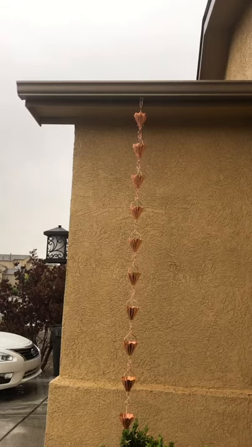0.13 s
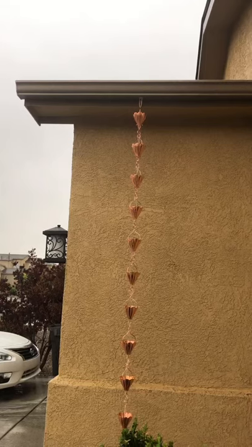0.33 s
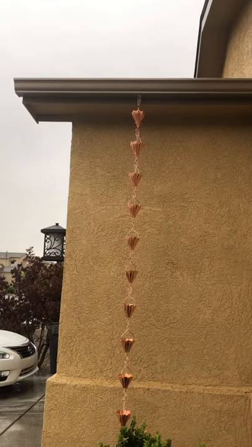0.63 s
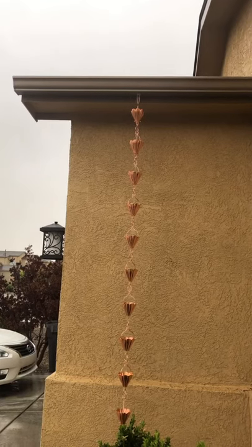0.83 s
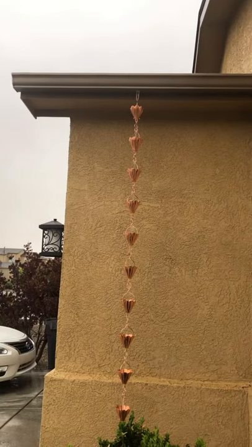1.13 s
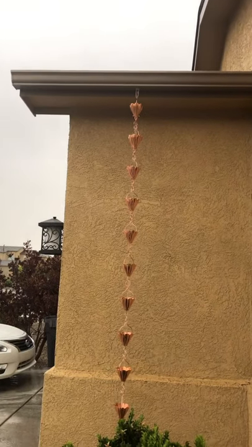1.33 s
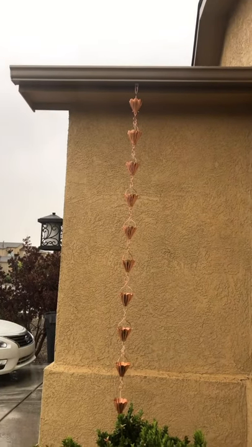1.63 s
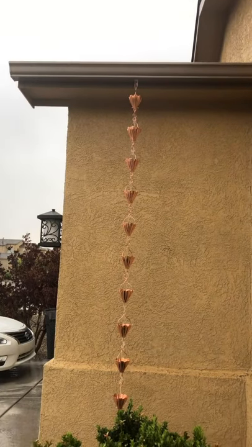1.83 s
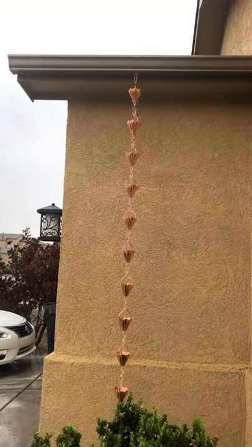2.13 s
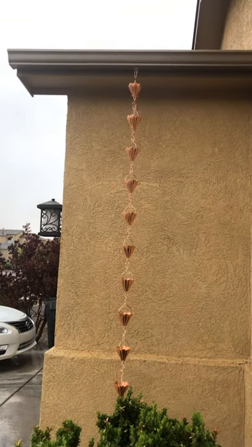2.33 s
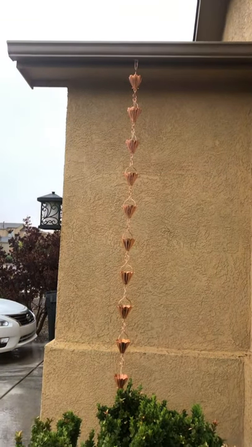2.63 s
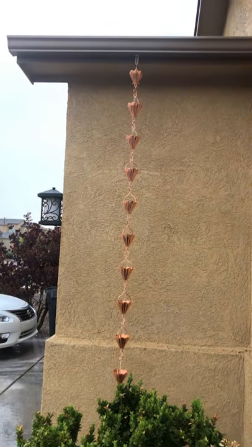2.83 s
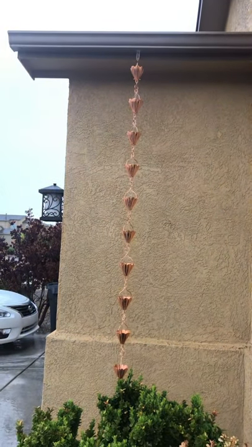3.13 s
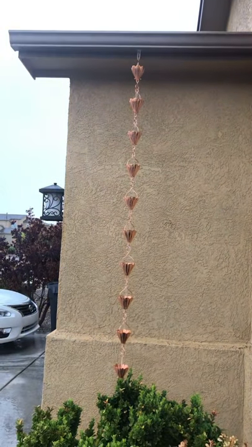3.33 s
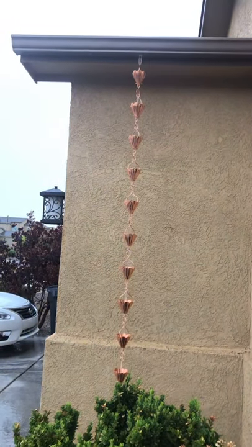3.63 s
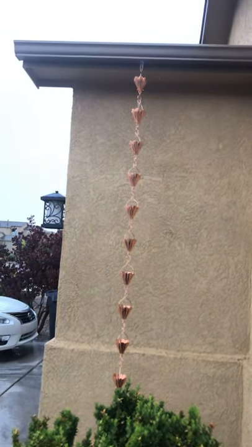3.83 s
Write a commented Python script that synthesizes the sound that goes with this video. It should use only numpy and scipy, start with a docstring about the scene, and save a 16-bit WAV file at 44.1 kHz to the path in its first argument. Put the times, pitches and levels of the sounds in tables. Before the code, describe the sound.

Steady light rain outdoors throughout, an even soft hiss with dense fine patter. Crisp single drops tick close by on leaves and paving, clearest near 0.3, 0.9 and 3.1 seconds. Brief dull metallic plinks from rain-chain cups come around 1.65, 2.35 to 2.6 and 3.75. Low wind puffs flutter against the microphone from about 1.2, becoming a strong lumpy rumble after 3 until the end.

```python
"""Steady rain outside a house: a wash of far drops (patchy coloured noise), a patter of small drops (damped sines),
near drops ticking on leaves and paving (band-filtered blow and spray), a few ringing the metal cups of a rain
chain (decaying modes). Wind buffets the microphone port: a lumpy noise rumble with single puffs that fall in
pitch (slowing sine swings)."""
import sys
import numpy as np
from scipy import signal
from scipy.fft import rfft, irfft, next_fast_len
from scipy.io import wavfile
from scipy.ndimage import uniform_filter1d, map_coordinates

SR = 44100
rng = np.random.default_rng(int(sys.argv[2]) if len(sys.argv) > 2 else 0)


def invert_db(x):
    """Field ratio 10**(x/20) for x, a level in decibels (scalar or array-like)."""
    u = np.asarray(x, float) / 20
    return 10 ** u


def materialize(psi):
    """Save the field psi as 16-bit PCM at rate SR to the path in sys.argv[1].

    A 1-D psi becomes a single channel; in a 2-D psi each row is a channel.
    """
    bounded = np.clip(np.atleast_2d(psi).T, -1, 1)
    quanta = np.round(bounded * 32767).astype(np.int16)
    wavfile.write(sys.argv[1], SR, quanta)


N = 176400


def unit(x):
    """Scale to rms 1."""
    return x / np.sqrt(np.mean(x ** 2) + 1e-20)


def curves(rows):
    """One value per sample for each column after the time."""
    s, *cols = np.transpose(rows)
    return [np.interp(np.arange(N) / SR, s, c) for c in cols]


def wobble(knots_per_s):
    """A smooth random curve through normally distributed knots."""
    at_knot = np.arange(N) * np.clip(knots_per_s, .1, 200) / SR
    return map_coordinates(rng.standard_normal(1000), [at_knot])


def coloured(x, points):
    """x through a (Hz, dB) spectrum, interpolated over log frequency, rms 1."""
    size = next_fast_len(N + 8192)
    hz, db = np.transpose(points)
    gain_db = np.interp(np.log(np.fft.rfftfreq(size, 1 / SR) + 1), np.log(hz), db)
    return unit(irfft(rfft(x, size) * invert_db(gain_db), size)[:N])


def place(seconds, rows):
    """Sum each row of samples at its time."""
    at = np.round(np.asarray(seconds) * SR).astype(int)[:, None] + np.arange(rows.shape[1])
    return np.bincount(at.ravel(), rows.ravel(), N + SR)[:N]


def tick(db, hz, cycles, size):
    """Damped sines living a few cycles, one row each."""
    turns = np.arange(size) / SR * np.clip(hz, 300, 16000)[:, None]
    decay = np.exp(-turns / np.clip(cycles, .3, 30)[:, None])
    return invert_db(db)[:, None] * np.sin(2 * np.pi * turns) * decay


def rain_wash():
    """Countless far drops: patchy noise that flutters a little; its treble drifts on its own."""
    # Wash level over time. Each row: time in seconds, level in dB before wash_db and flutter.
    level_rows = [(0.05, -52.5), (0.64, -52), (1.05, -52.5), (1.68, -51.5), (2.18, -54), (2.43, -53),
                  (3.55, -53), (3.79, -50), (4.0, -51.5)]
    # Wash spectrum. Each row: frequency in Hz, relative density in dB.
    spectrum = [(30, -22), (50, 0.5), (80, -19), (150, -12.5), (300, -11.5), (600, -13), (1000, -13),
                (2000, -17.5), (3500, -21.5), (5000, -22), (7000, -24), (9000, -29.5), (11000, -30.5),
                (13000, -37.5), (14500, -31.5), (15600, -30), (16500, -59)]
    # Treble drift. Each row: time in seconds, treble gain in dB.
    treble_rows = [(0, 4.5), (.4, -0.5), (.8, 0.5), (1.3, -1), (1.8, -0.5), (2.3, 1), (2.7, 1.5),
                   (3.1, 0.5), (3.5, 0.2), (4, -1.5)]
    wash_db, patchy_db, flutter_db = 1.81, 0.8, 0.77
    treble_from_hz = 5900

    z = signal.stft(rng.standard_normal(N), nperseg=512)[2]
    field = uniform_filter1d(rng.standard_normal(z.shape), size=8, axis=0)
    field = uniform_filter1d(field, size=8, axis=1)
    patchy = signal.istft(z * invert_db(patchy_db * unit(field)), nperseg=512)[1][:N]
    noise = coloured(patchy, spectrum)

    highpass = 1 / (1 + (treble_from_hz / (np.fft.rfftfreq(N, 1 / SR) + 1)) ** 6)
    treble = irfft(rfft(noise) * highpass, N)
    level_db, = curves(level_rows)
    treble_db, = curves(treble_rows)
    flutter = flutter_db * (wobble(6.1) + wobble(24.96))
    return invert_db(level_db + wash_db + flutter) * (noise - treble + invert_db(treble_db) * treble)


def patter():
    """Small random drops as damped sines, a few much louder than the rest."""
    count = 4000
    base_db, spread_db = -52.5, 2
    centre_hz, spread_octaves = 6020, 0.914
    median_cycles, cycles_log_spread = 2.5, .6
    u, g = rng.random((count, 2)), rng.standard_normal((count, 2))
    db = base_db - spread_db * np.log(u[:, 1] + 0.006)
    hz = centre_hz * 2 ** (spread_octaves * g[:, 0])
    cycles = median_cycles * np.exp(cycles_log_spread * g[:, 1])
    return place(u[:, 0] * N / SR, tick(db, hz, cycles, size=512))


def wind():
    """Lumpy turbulence on the port: noise in a deep body and an upper edge sharing their lumps."""
    # Rumble over time. Each row: time in seconds, body level in dB, upper edge over body in dB.
    level_rows = [(.05, -59.5, -2.5), (.4, -64.5, 2.5), (.66, -52, -8), (.76, -55, -2), (.8, -58, -5),
                  (1.14, -55, -2.5), (1.2, -50, -3.5), (1.35, -47.5, -5), (1.42, -49.5, -4),
                  (1.5, -50, 2.5), (1.7, -44, -6), (1.78, -57.5, -17), (2.0, -61.5, 4), (2.1, -46, 0),
                  (2.3, -50.5, -6.5), (2.5, -46.5, -7), (2.77, -49, -14.5), (2.9, -44.5, 4),
                  (3.04, -51.5, -9), (3.13, -39, -3), (3.35, -47, 1.5), (3.55, -40.5, -5),
                  (3.67, -45.5, -9.5), (3.78, -41, -6.5), (4.0, -37.5, -3)]
    # Body spectrum. Each row: frequency in Hz, relative density in dB.
    low_spectrum = [(15, -62), (30, -49), (50, -3.5), (75, 9.5), (120, 0.5), (170, -6.5), (300, -43.5)]
    # Upper edge spectrum. Each row: frequency in Hz, relative density in dB.
    high_spectrum = [(80, -45), (150, 0), (200, -1.5), (300, -8.5), (450, -14), (800, -54), (1500, -83)]
    lump_depth_db, lumps_per_s = 2.5, 25
    edge_lump_db, edge_lumps_per_s = 4, 60

    low_db, edge_db = curves(level_rows)
    lump_db = lump_depth_db * wobble(lumps_per_s)
    low = unit(invert_db(lump_db) * coloured(rng.standard_normal(N), low_spectrum))
    high_lump_db = lump_db + edge_lump_db * wobble(edge_lumps_per_s)
    high = unit(invert_db(high_lump_db) * coloured(rng.standard_normal(N), high_spectrum))
    return invert_db(low_db) * (low + invert_db(edge_db) * high)


def near_drops():
    """A sharp blow and a short spray of noise, both through a band around each drop's own pitch."""
    # Near drops. Each row: time in seconds, peak of the blow in dB, centre in Hz, spread in octaves.
    drop_rows = [(.052, -37, 4000, 0.97), (0.268, -48, 1940, 0.093), (.1094, -37, 10100, .3),
                 (0.134, -34.5, 4360, 0.43), (.142, -33.5, 8100, 0.21), (0.254, -39, 12000, .5),
                 (0.28, -28.5, 9000, 0.96), (.391, -38, 9500, .4), (0.534, -38, 10000, 0.36),
                 (.69, -38, 10000, .7), (.709, -52, 3900, .5), (0.7545, -33, 6500, 0.36),
                 (0.878, -44, 11000, .5), (0.8807, -27.5, 5500, 0.53), (0.8807, -33, 15000, 0.15),
                 (0.981, -33, 10000, 0.92), (1.378, -43, 3600, 0.16), (1.4248, -35, 3830, .25),
                 (1.456, -42, 3800, 0.28), (1.819, -37.5, 8250, 0.36), (1.889, -46, 4830, .2),
                 (2.03, -45, 11000, 0.45), (2.3353, -37.5, 9350, 0.54), (2.62, -49, 14000, 0.35),
                 (2.90, -47, 14000, .3), (3.012, -46, 12500, .3), (3.1407, -25, 7800, 1.1),
                 (3.291, -49, 14000, .3), (3.42, -43, 14000, .3), (3.526, -38, 5300, 0.73),
                 (3.639, -35, 5000, 0.73), (3.92, -52, 12000, 0.37)]
    spray_db, spray_t60_s = -24, .02
    size = 2048

    s, db, hz, octaves = np.transpose(drop_rows)
    t, f = np.arange(size) / SR, np.fft.rfftfreq(size, 1 / SR)
    offset = np.log2((f + 1) / hz[:, None]) / np.clip(octaves, .1, 2)[:, None]
    band = np.exp(-.5 * offset ** 2)
    # Minimum phase by folding the cepstrum: nothing sounds ahead of the blow.
    fold = np.r_[1, 2 * np.ones(1023), 1, np.zeros(1023)]
    causal = np.exp(rfft(irfft(np.log(band + 0.001)) * fold))
    spray = rng.standard_normal((len(s), size)) * invert_db(spray_db - 60 * t / spray_t60_s)
    blow = (t == 0) + spray
    response_peak = np.abs(irfft(causal)).max(axis=1, keepdims=True)
    return place(s, invert_db(db)[:, None] * irfft(rfft(blow) * causal) / response_peak)


def puffs():
    """A puff of air on the port swings a few times, each swing slower than the last."""
    # Puffs. Each row: time of the peak in seconds, peak in dB, pitch at the peak in Hz, life in cycles.
    puff_rows = [(.682, -33, 109, 0.19), (.731, -38, 116, 0.87), (0.8817, -27.5, 482, 1.54),
                 (1.174, -43, 70.5, 0.65), (1.268, -27.5, 140, 1.3), (1.322, -30, 157, 0.52),
                 (1.322, -37.5, 380, 0.54), (1.335, -32, 67.5, 0.42), (1.452, -37, 94, .6),
                 (1.489, -31.5, 107, 0.44), (1.578, -37, 80, 0.75), (1.69, -34, 107, 1.5),
                 (1.523, -37, 118, 0.46), (1.614, -36, 223, 1.1), (1.648, -24.5, 163, 1.05),
                 (2.103, -31, 176, 0.33), (2.116, -27.5, 173, 0.91), (2.136, -31.5, 81, 0.57),
                 (2.222, -32.5, 94, 1), (2.274, -41, 79, .6), (2.308, -38.5, 117, 0.36),
                 (2.372, -40, 90.5, 0.69), (2.403, -36, 97, 1.1), (2.448, -41, 129, .7),
                 (2.522, -30, 98, 1.2), (2.71, -37.5, 83, 1.1), (2.813, -42, 120, 0.69),
                 (2.873, -36, 140, 0.46), (2.907, -38, 335, 0.72), (2.924, -29, 140, .6),
                 (2.947, -33, 95, 0.92), (2.993, -33, 79, .7), (3.0586, -23, 640, 1.1),
                 (3.084, -25, 123, 1.8), (3.115, -31, 98, 1.8), (3.172, -38, 94, 1.1),
                 (3.23, -36, 87.5, .5), (3.245, -27, 113, 0.6), (3.299, -27.5, 92, 0.99),
                 (3.318, -26, 142, 0.68), (3.375, -35.5, 400, .7), (3.384, -26, 99, 0.54),
                 (3.497, -27.5, 115, 0.48), (3.528, -35.5, 193, 0.9), (3.556, -31.5, 104, .5),
                 (3.574, -29, 120, 0.94), (3.606, -27, 84, 0.41), (3.768, -28, 139, 1.3),
                 (3.802, -32, 100, 2.3), (3.886, -36, 125, .8), (3.921, -27.5, 125, .5),
                 (3.952, -28, 89, 0.67), (3.975, -27, 122, 1.1)]
    fall_per_cycle, rise_cycles = .5, 1.5  # log pitch drop; swings until the peak

    s, db, hz, life = np.transpose(puff_rows)[:, :, None]
    drop = np.exp(fall_per_cycle * rise_cycles)  # pitch ratio, onset to peak
    turns = np.log1p(fall_per_cycle * hz * drop * np.arange(SR // 8) / SR) / fall_per_cycle
    u = turns / rise_cycles
    shape = (u * np.exp((1 - u ** 2) / 2)) ** (rise_cycles / np.clip(life, .1, 3))
    shape = shape * np.hanning(SR // 4)[SR // 8:SR // 8 * 2]  # fade to zero
    rise_s = (1 - 1 / drop) / (fall_per_cycle * hz)
    return place((s - rise_s)[:, 0], invert_db(db) * shape * np.sin(2 * np.pi * turns))


def cups():
    """Each blow rings the metal cups' modes anew; running water shakes the ringing in level and phase."""
    # Drops on the cups. Each row: time in seconds, blow level in dB, most excited region in Hz,
    # its spread in octaves.
    hits = [(1.6476, -35.5, 3300, 1.7), (1.661, -38, 2940, 0.23), (2.3545, -39, 3670, 0.18),
            (2.486, -35.5, 3670, 0.22), (2.492, -38.5, 1100, .3), (2.497, -35, 3430, 0.085),
            (2.52, -43, 3700, 0.27), (2.5955, -39, 3660, 0.16), (3.754, -33.5, 2690, 0.2)]
    # Modes of the cups. Each row: frequency in Hz, relative level in dB, t60 in seconds.
    modes = [(1100, -2, .1), (2540, -3, .1), (2840, -5, .13), (3250, -1, .035), (3450, -2, .03),
             (3720, 0, .035), (4300, -6, .03)]
    attack_s = .0007
    splash_depth_db, splash_rough_rad = 3, .09  # phase roughness is per sample

    t, rows = np.arange(SR // 4) / SR, []
    hz, level_db, t60_s = np.transpose(modes)[:, :, None]
    attack = 1 - np.exp(-t / attack_s)
    for _, db, centre_hz, octaves in hits:
        shake = uniform_filter1d(rng.standard_normal((len(modes), len(t))), size=150) * np.sqrt(150)
        drift = np.cumsum(rng.standard_normal((len(modes), len(t))), axis=1)
        excitation = np.exp(-.5 * (np.log2(hz / centre_hz) / octaves) ** 2)
        gain = invert_db(db + level_db + splash_depth_db * shake - 60 * t / t60_s) * excitation
        ringing = np.sin(2 * np.pi * hz * t + splash_rough_rad * drift)
        rows.append(np.sum(gain * ringing, axis=0) * attack / 2)
    return place([hit[0] for hit in hits], np.array(rows))


def scene():
    """All sources at one microphone."""
    return (rain_wash() + patter() + wind() + near_drops() + puffs() + cups())[None]


def roll_off(x):
    """The treble ends steeply here."""
    return signal.sosfilt(signal.butter(12, 17070, fs=SR, output="sos"), x)


def record(dry):
    """Silence until the sound begins with a short fade, and a steep band limit."""
    start_s, fade_s, top_hz = .0356, 0.0024, 15780
    t = np.arange(N) / SR
    faded = dry * np.clip((t - start_s) / fade_s, 0, 1)
    limited = irfft(rfft(faded) * (np.fft.rfftfreq(N, 1 / SR) < top_hz), N)
    mix = limited * (t > start_s - .002)  # trims the filter's pre-ringing
    return roll_off(mix)


dry = scene()
out = record(dry)
materialize(out)
```